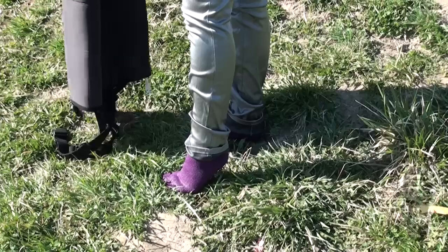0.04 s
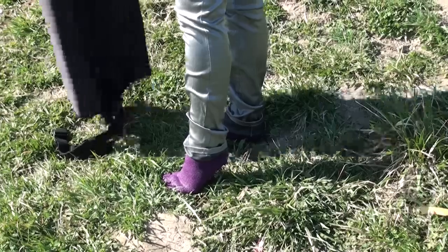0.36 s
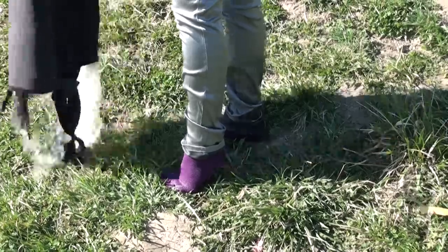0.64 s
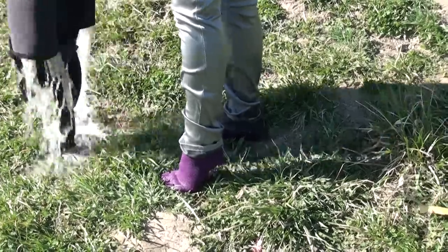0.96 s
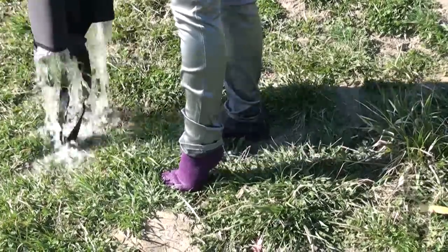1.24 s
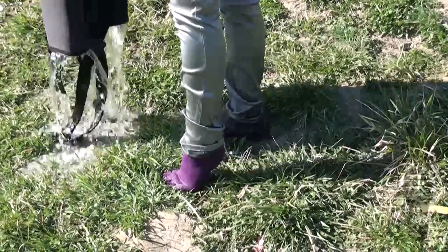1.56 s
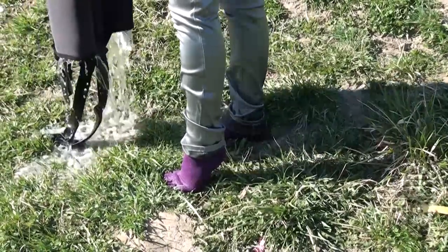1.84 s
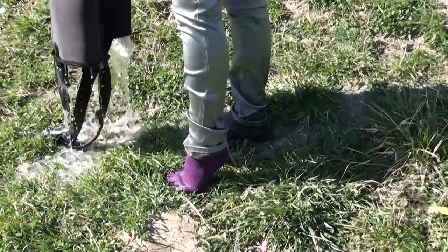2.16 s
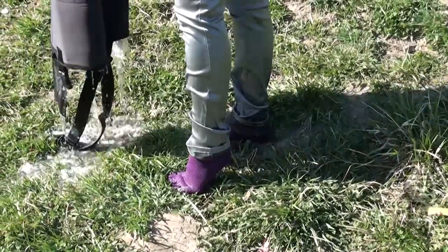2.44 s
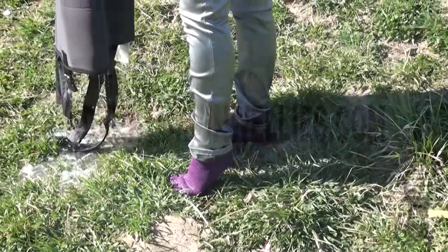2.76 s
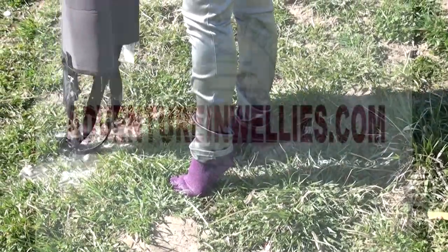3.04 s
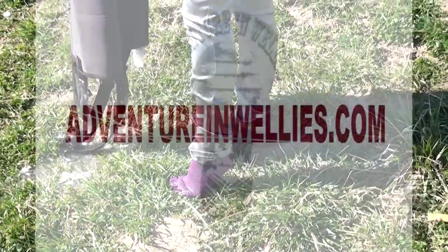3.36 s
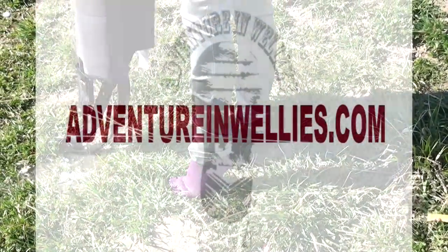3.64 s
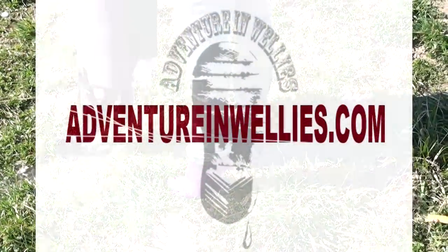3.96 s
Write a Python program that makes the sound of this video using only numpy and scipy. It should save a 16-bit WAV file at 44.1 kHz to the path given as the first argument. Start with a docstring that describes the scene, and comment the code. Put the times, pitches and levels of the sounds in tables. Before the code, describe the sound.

Water pours out of rubber waders onto grass. The wet rubber flaps and creaks briefly, then a gush splashes and glugs, thinning to a trickle and drips. Wind rumbles on the microphone outdoors.

```python
"""Rubber waders are tipped out over a lawn, in open air, with wind rumbling on a single microphone.
First the wet rubber flaps and creaks by stick-slip friction while the water slides down inside.
At about 0.6 s it gushes onto the grass: drop impacts splash and spray, and trapped air pockets glug.
From 2 s the stream thins to a trickle with single fat drops. Near 3 s a far bird whistles faintly
twice, and gusts buffet the microphone over the last drips."""
import sys
import numpy as np
from scipy import signal
from scipy.fft import rfft, irfft, next_fast_len
from scipy.io import wavfile
from scipy.ndimage import uniform_filter1d

SR = 44100
rng = np.random.default_rng(int(sys.argv[2]) if len(sys.argv) > 2 else 0)


def pcm_store(signal):
    """Save signal as 16-bit PCM."""
    levels = np.round(np.clip(np.atleast_2d(signal), -1, 1) * 32767)
    wavfile.write(sys.argv[1], SR, levels.astype(np.int16).T)


N = 176400
TIME = np.arange(N) / SR


def from_db(db):
    """Amplitude ratio of a level in decibels."""
    return 10 ** (np.asarray(db) / 20)


def rms_one(x):
    """Normalisation to unit rms."""
    return x / np.sqrt(np.mean(x ** 2) + 1e-20)


def curve(rows):
    """Linear interpolation between (t/s, value) rows."""
    return np.interp(TIME, *np.transpose(rows))


def steady(x, window_s):
    """Division by the running rms: slow level changes go, faster detail stays."""
    size = max(int(window_s * SR), 8)
    power = uniform_filter1d(uniform_filter1d(x ** 2, size), size)
    return x / np.sqrt(np.abs(power) + 1e-12)


def colour(x, points):
    """Minimum-phase filtering through (f/Hz, level/dB) points, to unit rms."""
    size = next_fast_len(N + SR // 2, real=True) // 2 * 2
    hz, db = np.transpose(points)
    log_hz = np.log(np.maximum(np.arange(size // 2 + 1) * SR / size, 1))
    cepstrum = irfft(np.log(from_db(np.interp(log_hz, np.log(hz), db))))
    cepstrum[1:size // 2] *= 2  # folding the cepstrum makes the filter causal
    cepstrum[size // 2 + 1:] = 0
    return rms_one(irfft(rfft(x, size) * np.exp(rfft(cepstrum)))[:N])


def ring(force, hz, t60):
    """Damped resonator: each impulse excites a sine that falls 60 dB in t60 seconds."""
    r, w = from_db(-60 / (t60 * SR)), 2 * np.pi * min(hz, .45 * SR) / SR
    return signal.lfilter([0, np.sin(w)], [1, -2 * r * np.cos(w), r * r], force + 1e-18)


def add(out, s, sound, db):
    """Superposition of a sound at time s, with peak level db."""
    i = max(int(s * SR), 0)
    out[i:i + len(sound)] += (from_db(db) * sound / (np.abs(sound).max() + 1e-12))[:N - i]


def flicker(depth_db, length_s):
    """Log-normal modulation: a smooth random factor around 1."""
    size = max(int(length_s * SR), 2)
    smooth = uniform_filter1d(uniform_filter1d(rng.standard_normal(N), size), size)
    return from_db(depth_db * rms_one(smooth))


def open_air():
    """Ambient noise: stationary, and strongest at low frequencies."""
    # background spectrum: f/Hz, relative level/dB
    spectrum = [(40, -6.5), (120, 4.5), (250, -5.5), (500, -10), (1000, -15.5), (1500, -27), (3300, -21),
                (5500, -52), (15000, -39)]
    return from_db(-34.5) * colour(rng.standard_normal(N), spectrum)


def wind():
    """Turbulent pressure at the microphone: a slow rumble, with faster buffeting in strong gusts."""
    # envelopes: t/s, relative level/dB
    rumble_levels = [(0, -26), (.46, -27), (.56, -4), (.68, -17.5), (.79, -18.5), (.92, -7.5),
                     (1.17, -25.5), (1.3, -17.5), (1.52, -28.5), (1.78, -22), (2.42, -19), (2.72, -22.5),
                     (2.88, -10.5), (3.07, -28.5), (3.2, -12.5), (3.32, -17.5), (3.43, -9), (3.68, -10),
                     (3.8, -13.5), (4, -20)]
    buffet_levels = [(0, -43), (.48, -44), (.54, -16), (.61, -30), (.66, -8.5), (.78, -33), (.9, -21),
                     (1.02, -19), (1.1, -37), (2.3, -37), (3.35, -34), (3.42, -22), (3.5, -23), (3.59, -12),
                     (3.75, -20.5), (3.87, -38), (4, -19.5)]
    # spectra: f/Hz, relative level/dB
    rumble_spectrum = [(6, -25.5), (16, 9), (30, 4.5), (50, -3), (80, -17), (120, -36), (200, -39.5),
                       (400, -43), (1000, -111)]
    buffet_spectrum = [(20, -1.5), (45, -6), (75, 9), (120, -5.5), (200, -22.5), (400, -55), (1000, -73)]
    rumble = steady(colour(rng.standard_normal(N), rumble_spectrum), .045)
    buffet = steady(colour(rng.standard_normal(N), buffet_spectrum), .035)
    return from_db(curve(rumble_levels)) * rumble + from_db(curve(buffet_levels) - 1.5) * buffet


def drops(rate, low_hz, high_hz, cycles, wash_db, spread_db=3.3, count=20):
    """Shot noise: random drops of uneven size each excite one resonance, over a white-noise wash."""
    sizes = from_db(spread_db * np.minimum(rng.exponential(1, N), 4)) * rng.choice([-1, 1], N)
    impacts = sizes * (rng.random(N) < rate / SR)
    mode = rng.integers(0, count, N)
    pitches = np.geomspace(low_hz, high_hz, count)
    patter = sum(hz * ring(impacts * (mode == k), hz, cycles / hz) for k, hz in enumerate(pitches))
    return rms_one(patter) + from_db(wash_db) * rng.standard_normal(N)


def pour():
    """Impact noise of one lumpy stream: splash on the lawn, spray on the blades, churn in the puddle."""
    # how finely the water falls: t/s, drop rate/(1/s)
    drop_rates = [(0, 9400), (.6, 4500), (.8, 4640), (1.4, 3630), (2.1, 1600), (2.8, 590), (3.4, 320),
                  (4, 230)]
    # envelopes: t/s, relative level/dB
    splash_levels = [(0, -36), (.13, -34.5), (.19, -37), (.42, -37.5), (.47, -29), (.635, -25.5),
                     (.67, -16), (.74, -13.5), (.88, -18.5), (1.06, -18), (1.14, -20), (1.4, -19.5),
                     (1.7, -26), (2.0, -24), (2.55, -30), (2.75, -33.5), (3.6, -37.5), (4.0, -41.5)]
    spray_levels = [(0, -53.5), (.42, -52.5), (.58, -44), (.645, -38), (.67, -25.5), (.74, -24.5),
                    (.9, -31.5), (1.07, -27), (1.4, -28.5), (1.7, -34.5), (2.03, -32), (2.5, -37.5),
                    (2.9, -43.5), (3.2, -43), (3.45, -48), (4.0, -49.5)]
    churn_levels = [(0, -33.5), (0.12, -28.5), (0.19, -35), (0.42, -36.5), (0.49, -31.5), (0.54, -21.5),
                    (0.6, -28.5), (0.69, -23), (0.8, -23.5), (0.9, -30), (1.0, -21), (1.11, -27.5),
                    (1.55, -31.5), (1.68, -38.7), (1.97, -33), (2.5, -36), (3.0, -49), (4.0, -43)]
    # spectra: f/Hz, relative level/dB
    splash_spectrum = [(900, -9.5), (1600, -10), (2100, -3), (2700, 0.5), (3600, 2.5), (4500, -5),
                       (6000, -17), (9000, -19)]
    spray_spectrum = [(3000, -9), (5500, 3.5), (7500, 0.5), (10000, -1.5), (13000, -3.5), (16000, -10.5)]
    churn_spectrum = [(100, 19.5), (250, -2.5), (450, -2), (750, -2.5), (1200, 0.5), (1700, 2),
                      (2600, -12.5)]
    rate, lumps = curve(drop_rates), flicker(depth_db=1.5, length_s=.0072)
    splash = lumps * drops(rate, low_hz=1513, high_hz=6960, cycles=11.8, wash_db=-10)
    spray = lumps * drops(rate, low_hz=4500, high_hz=15900, cycles=5.9, wash_db=-12)
    churn = lumps * drops(.3 * rate, low_hz=255, high_hz=2010, cycles=27, wash_db=-2, spread_db=2.739)
    return (from_db(curve(splash_levels) - .5) * steady(colour(splash, splash_spectrum), .063)
            + from_db(curve(spray_levels) + 1.5) * steady(colour(spray, spray_spectrum), .22)
            + from_db(curve(churn_levels) - .5) * steady(colour(churn, churn_spectrum), .045))


def rubber_creaks(slips_per_s=74):
    """Stick-slip friction: wet rubber lets go in short, nearly periodic runs of ticks."""
    # creaks: t/s, duration/s, mean peak level/dB, f/Hz
    creaks = [(0.04, .004, -24, 4500), (0.094, .05, -20, 11500), (0.15, .025, -17, 11500),
              (0.266, .018, -18, 11500)]
    out, impulse = np.zeros(N), signal.unit_impulse(SR // 5)
    for s, length_s, db, hz in creaks:
        for delay in np.arange(0, length_s, 1 / slips_per_s):
            late, strength = rng.standard_normal(2)
            add(out, s + delay + .0012 * late, ring(impulse, hz, 4 / hz), db + 3 * strength)
    return out


def rubber_flaps(attack_cycles=.66):
    """Damped vibration: the legs flap and buckle, each time with a dull tone and rubbing noise."""
    # flaps: t/s, peak level/dB, f/Hz, 60 dB decay time/s
    flaps = [(0.043, -16, 660, 0.024), (0.047, -13.5, 1570, .02), (.116, -15, 312, 0.018),
             (.223, -16.5, 590, 0.032), (0.243, -10, 237, 0.11), (.252, -19.5, 540, .04),
             (.292, -19, 231, 0.11), (0.324, -23, 309, 0.14), (0.36, -14, 276, 0.044),
             (0.481, -10, 286, 0.066)]
    out, t = np.zeros(N), TIME[:SR // 5]
    for s, db, hz, t60 in flaps:
        envelope = (1 - np.exp(-(t * hz / attack_cycles) ** 2)) * from_db(-60 * t / t60)
        rub = rms_one(ring(rng.standard_normal(len(t)), hz * 1.06, 1.7 / hz))
        add(out, s, envelope * (np.sin(2 * np.pi * hz * t) + .57 * rub), db)
    return out


def splat(hz, decay_s, scatter_db, crack_db, cycles=5):
    """Impact transient: a heavily damped slap with a thin crack, then a dying scatter of droplets."""
    t = TIME[:SR // 20]
    crack = np.diff(ring(signal.unit_impulse(len(t)), hz, cycles / hz), prepend=0)
    burst = np.diff(ring(crack, hz, cycles / hz), prepend=0)
    slap = rms_one(burst) + from_db(crack_db) * rms_one(crack)
    scatter = rms_one(signal.fftconvolve(rng.standard_normal(len(t)), slap)[:len(t)])
    envelope = (1 - np.exp(-t * hz / 2)) * np.exp(-t / decay_s)
    return slap / np.abs(slap).max() + from_db(scatter_db) * scatter * envelope


def landings():
    """Single impacts stand out from the stream; the smallest drops sound highest."""
    # tiny droplets on the blades: t/s, peak level/dB, f/Hz
    ticks = [(0.334, -32, 8500), (2.945, -28, 7600), (3.084, -25, 9100), (3.217, -20, 7240),
             (3.372, -23, 7600), (3.713, -30, 9500), (3.716, -28, 12500), (3.751, -36, 13000),
             (3.938, -26, 13200)]
    # fat drops and lumps of water: t/s, peak level/dB, f/Hz, scatter time constant/s
    fat_drops = [(0.6494, -2, 2030, 0.0071), (.6545, -19, 4970, .006), (0.68, -12, 3040, 0.0025),
                 (.7305, -5.5, 3200, 0.0046), (.7355, -4, 5870, 0.0046), (.7835, -8, 3680, 0.0034),
                 (0.794, -4.5, 1800, 0.0024), (0.807, -16, 3400, .001), (0.8278, -4, 2950, .001),
                 (.836, -2, 3920, 0.0016), (.957, -6, 2780, .005), (1.036, -5, 3480, .004),
                 (1.092, -15, 2680, 0.0023), (1.0926, 4, 3030, 0.0018), (1.178, -5, 2700, 0.0033),
                 (1.2862, -2.5, 3600, 0.0023), (1.4114, -4, 3400, .004), (1.5922, -8.5, 2400, 0.0032),
                 (1.5986, -5.5, 2670, .003), (1.6717, -5, 3800, 0.0014), (1.9784, -7, 3400, .002),
                 (2.0765, -11, 3470, 0.012), (2.1492, -7, 3830, .001), (2.1587, -7, 4000, 0.0023),
                 (2.2087, -6.5, 2800, 0.003), (2.2108, -14, 2980, 0.0036), (2.559, -14, 4200, 0.01)]
    # drips as the stream breaks up: t/s, peak level/dB, f/Hz
    drips = [(2.384, -21, 6500), (2.437, -16, 6500), (2.9124, -6, 8150), (2.9399, -8, 3400),
             (2.9665, -16.5, 2410), (2.9695, -7, 2720), (2.9831, -12, 3300), (3.0373, -16.5, 2720),
             (3.0846, -15, 3460), (3.1234, -12.5, 2960), (3.1505, -15.5, 4500), (3.2071, -14, 2880),
             (3.216, -13.5, 4870), (3.356, -11, 2900), (3.3903, -15.5, 3500), (3.431, -18, 2270),
             (3.4987, -16.5, 2570), (3.5383, -16.5, 2850), (3.5988, -13, 3500), (3.6029, -19, 3100),
             (3.6962, -27, 2930)]
    out = np.zeros(N)
    for s, db, hz in ticks:
        add(out, s, splat(hz, decay_s=.0034, scatter_db=-8, crack_db=-1), db)
    for s, db, hz, decay_s in fat_drops:
        add(out, s, splat(hz, decay_s, scatter_db=-8, crack_db=-7), db)
    for s, db, hz in drips:
        add(out, s, splat(hz, decay_s=.0018, scatter_db=-9, crack_db=-6), db)
    return out


def glugs(cycles=24):
    """Bubble resonance: air pockets open with a wet slap, then ring and rise in pitch as they close."""
    # air pockets in stream and puddle: t/s, relative level/dB, starting f/Hz
    pockets = [(0.533, -21.5, 713), (0.691, -12.5, 1430), (0.821, -9.5, 1570), (0.984, -17.5, 424),
               (1.002, -16, 1080), (1.055, -22.5, 590), (1.593, -18, 980), (1.844, -25, 592),
               (1.995, -22.5, 800), (2.236, -14.5, 1000), (2.272, -22.5, 525), (2.324, -23, 1000),
               (2.432, -26, 1150)]
    out, t = np.zeros(N), TIME[:SR // 10]
    for s, db, hz in pockets:
        age = t * hz / cycles
        envelope = from_db(-60 * age) * (1 - np.exp(-t / .001))
        tone = np.sin(2 * np.pi * hz * t * (1 + .21 * age))
        add(out, s, splat(hz, decay_s=.0056, scatter_db=8, crack_db=-10), db - 2.5)
        add(out, s + .0012, envelope * tone, db - 1.5)
    return out


def far_bird():
    """Two nearly pure tones, wavering by slight random frequency modulation."""
    # whistles: t/s, duration/s, f/Hz, peak level/dB
    whistles = [(2.72, .14, 2140, -37), (2.954, 0.14, 2480, -44)]
    out, waver = np.zeros(N), flicker(depth_db=.06, length_s=.006)
    for s, length_s, hz, db in whistles:
        size = int(length_s * SR)
        phase = 2 * np.pi * np.cumsum(hz * waver[:size]) / SR
        add(out, s, np.sin(phase) * np.sqrt(np.hanning(size)), db)
    return out


def scene():
    """Superposition: all sources sum at one microphone, alike in both channels."""
    pressure = open_air() + wind() + pour() + rubber_creaks() + rubber_flaps()
    pressure += landings() + glugs() + far_bird()
    return np.tile(pressure, (2, 1))


def record(dry, ceiling=.95, cutoff_hz=15900):
    """Soft saturation rounds the peaks; a steep low-pass filter limits the bandwidth."""
    rounded = dry / (1 + (dry / ceiling) ** 6) ** (1 / 6)
    return signal.sosfilt(signal.ellip(12, .1, 80, cutoff_hz, fs=SR, output="sos"), rounded)


dry = scene()
out = record(dry)
pcm_store(out)
```